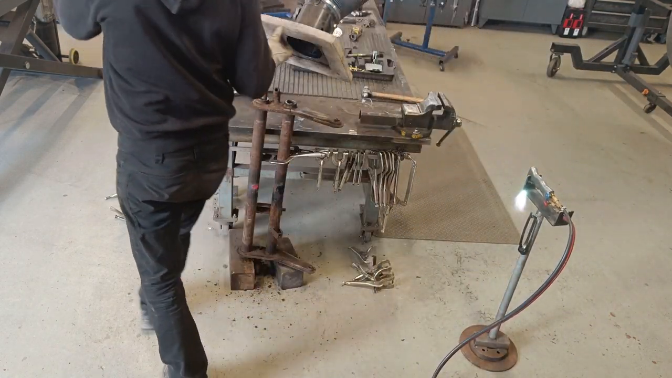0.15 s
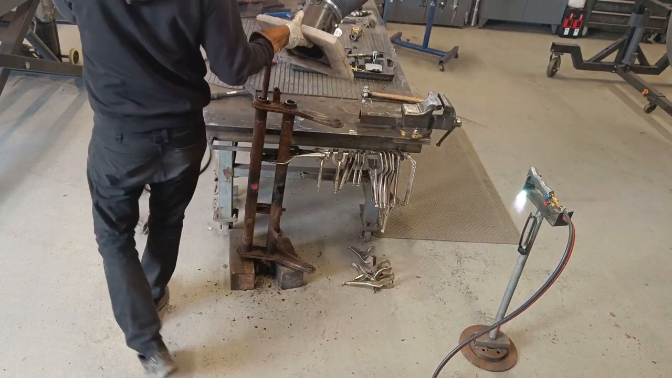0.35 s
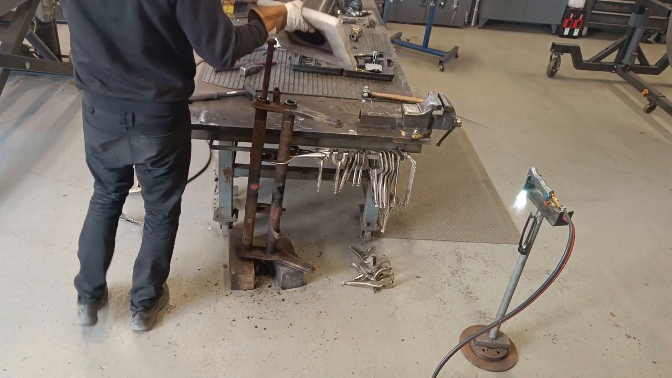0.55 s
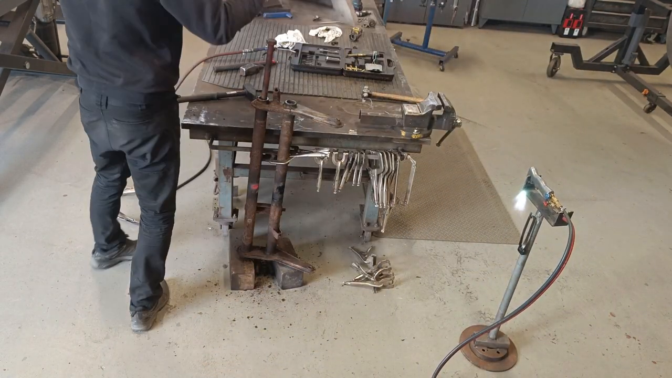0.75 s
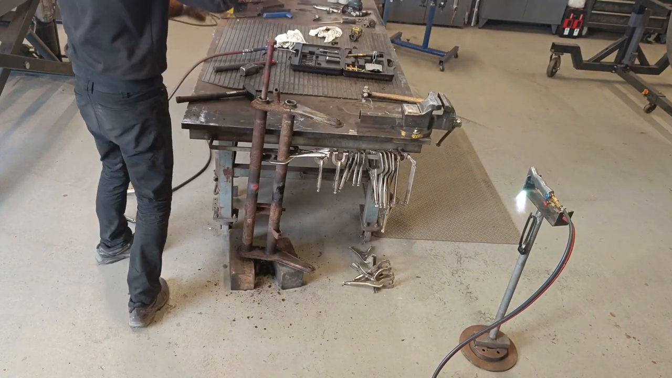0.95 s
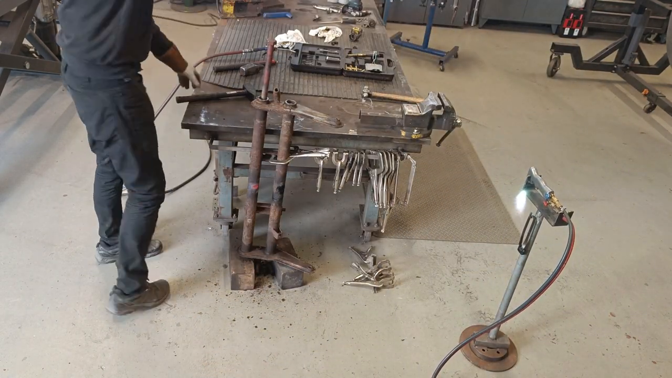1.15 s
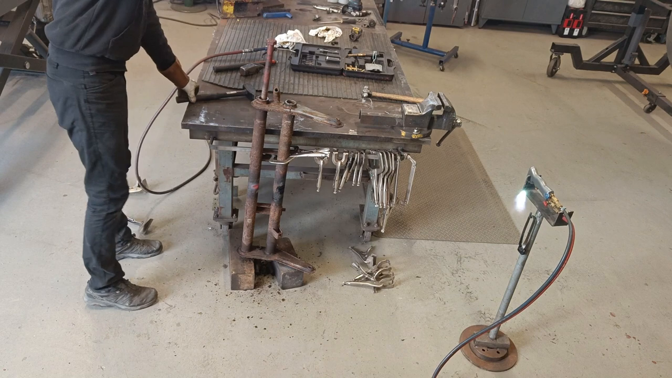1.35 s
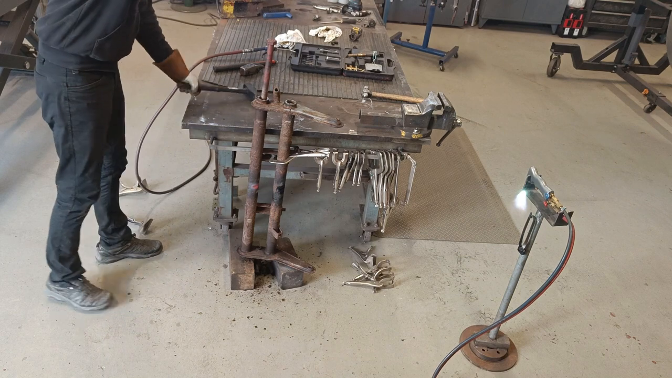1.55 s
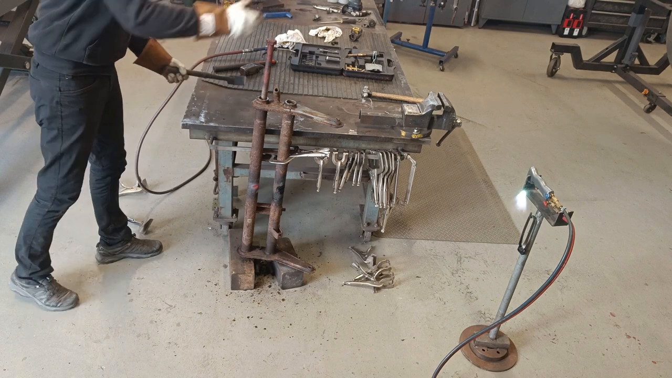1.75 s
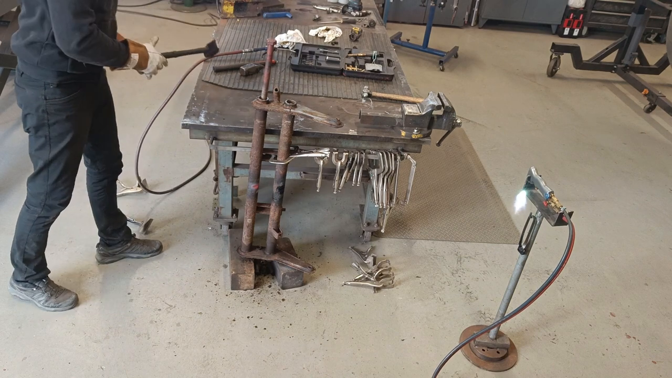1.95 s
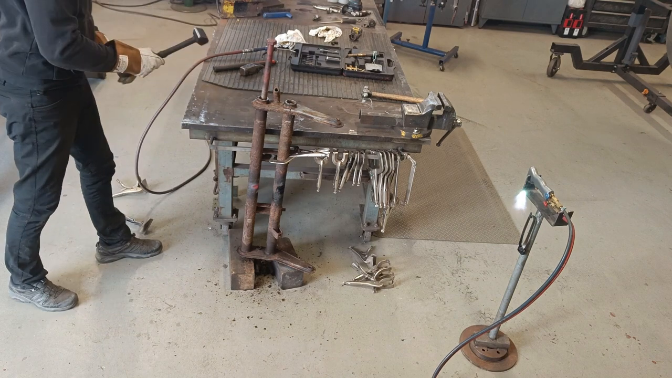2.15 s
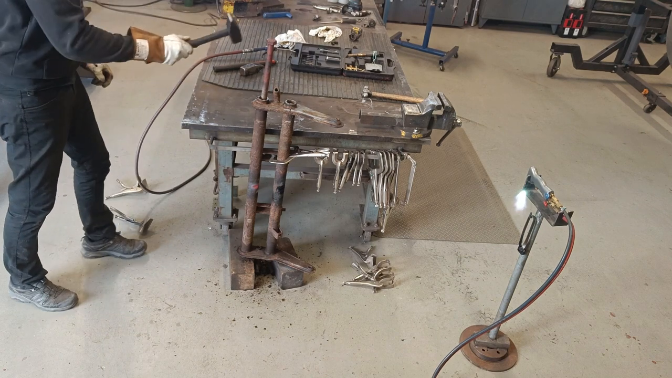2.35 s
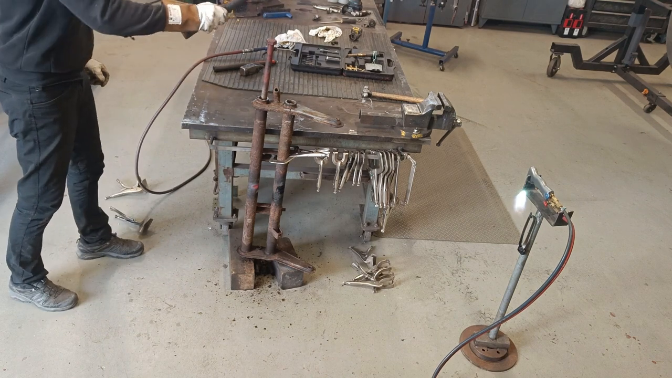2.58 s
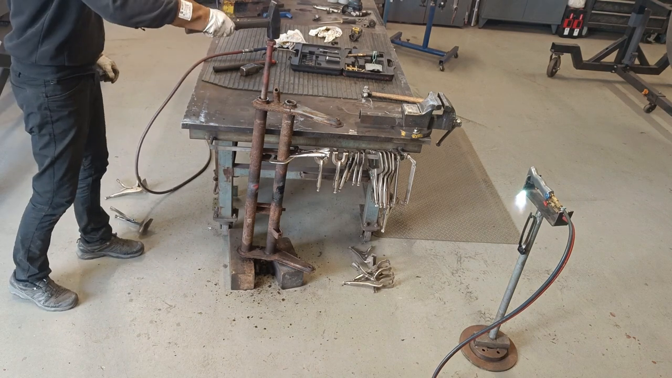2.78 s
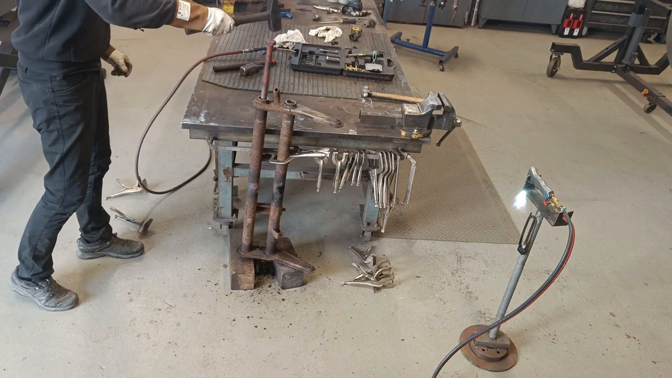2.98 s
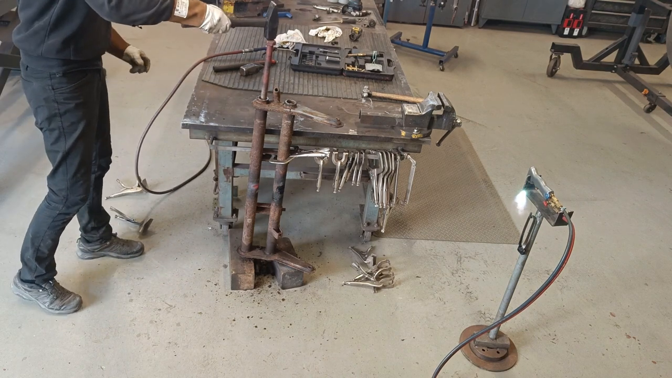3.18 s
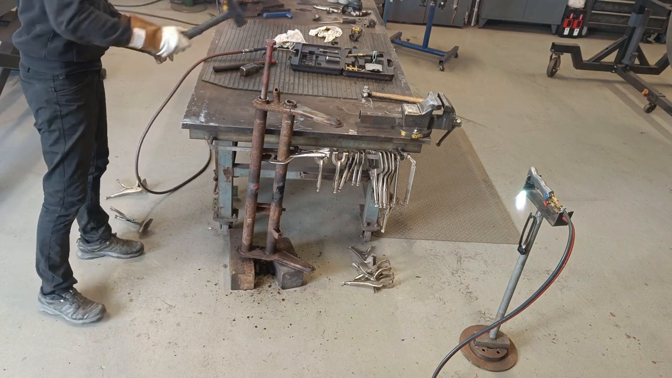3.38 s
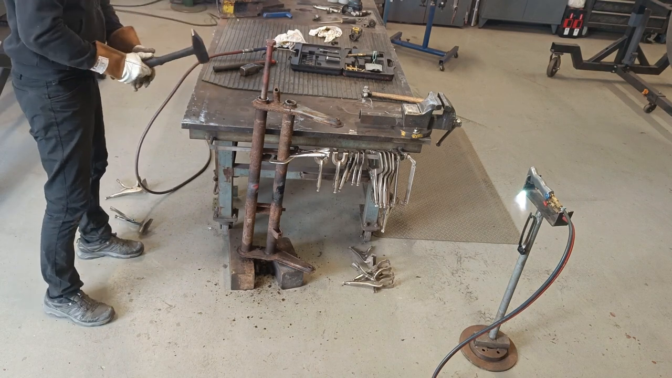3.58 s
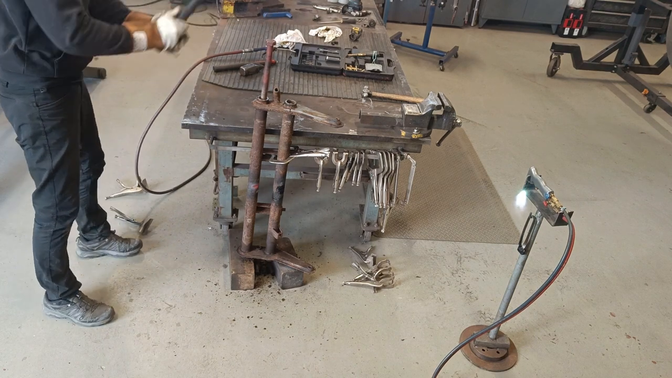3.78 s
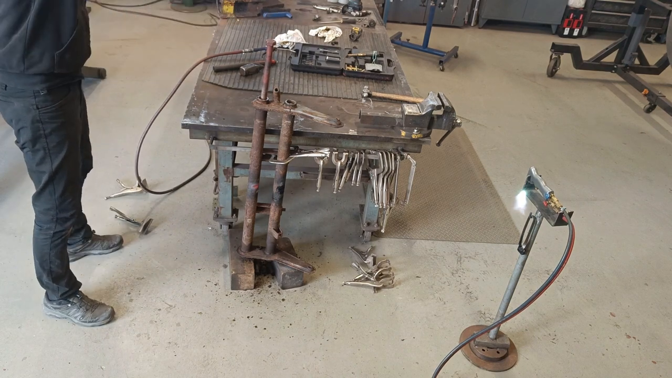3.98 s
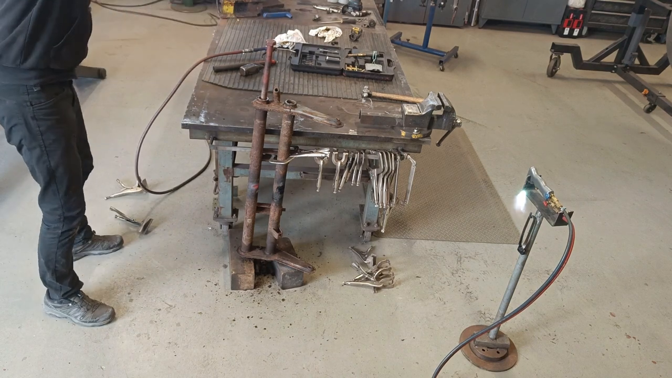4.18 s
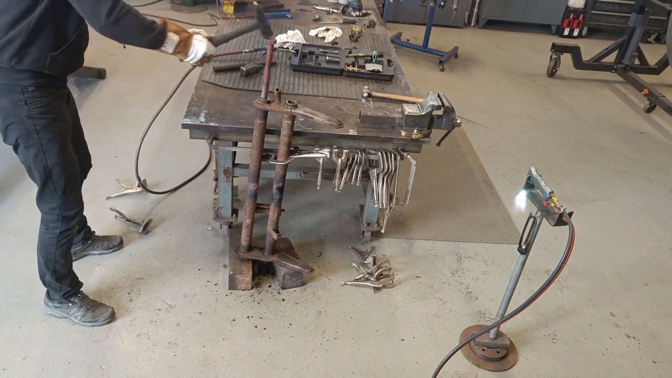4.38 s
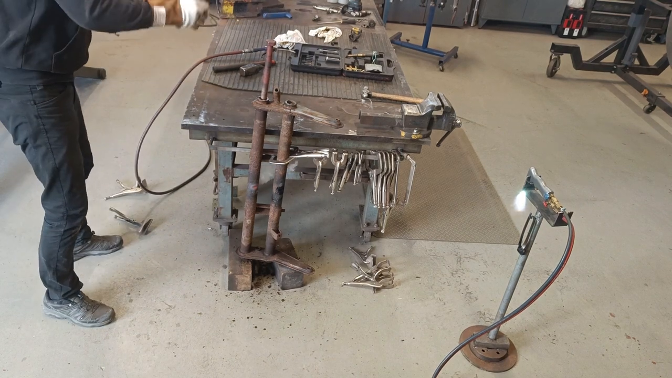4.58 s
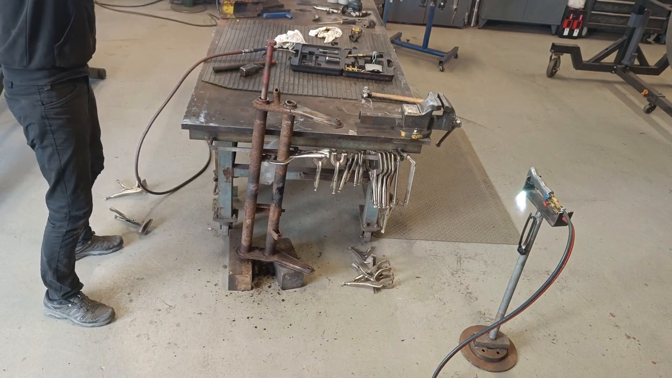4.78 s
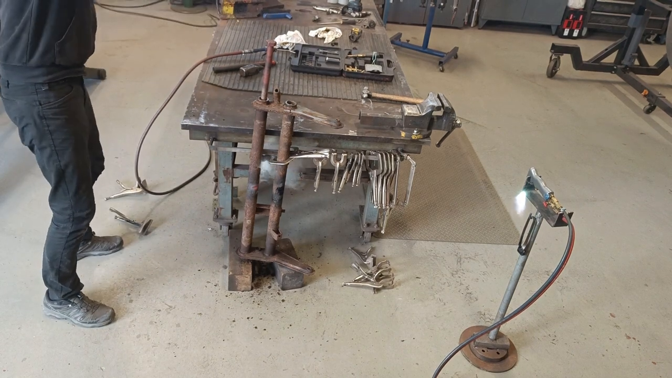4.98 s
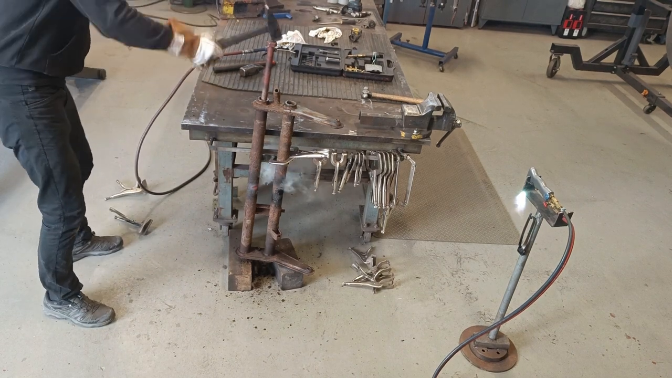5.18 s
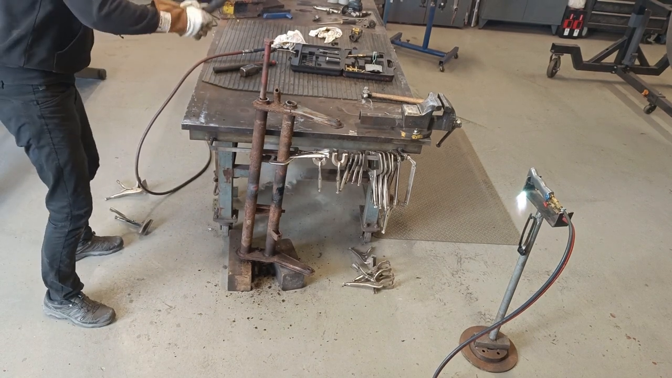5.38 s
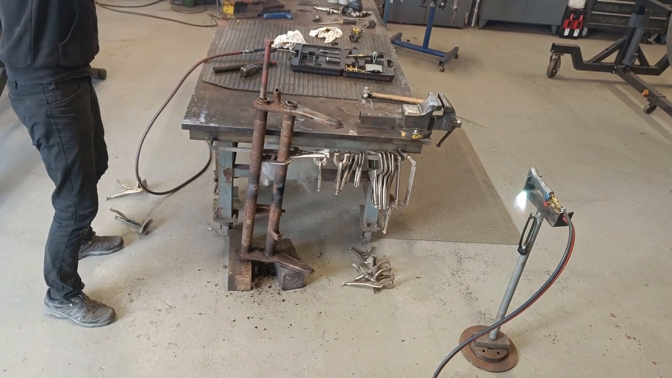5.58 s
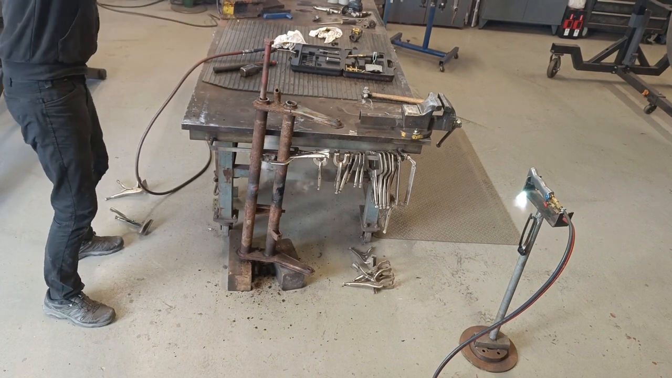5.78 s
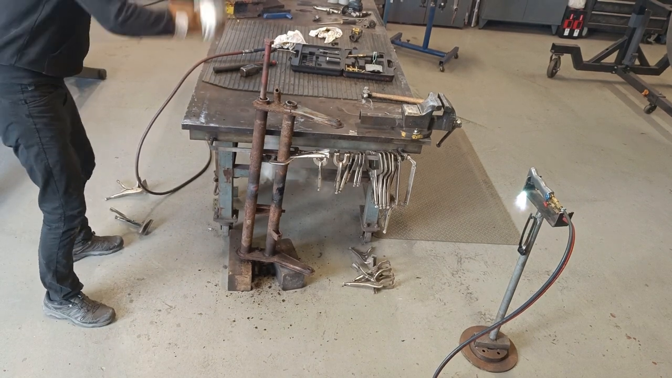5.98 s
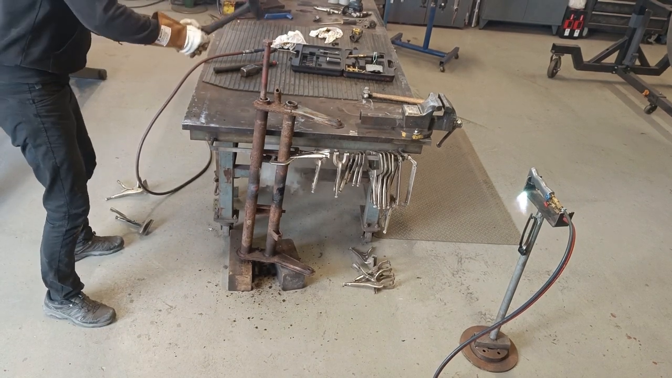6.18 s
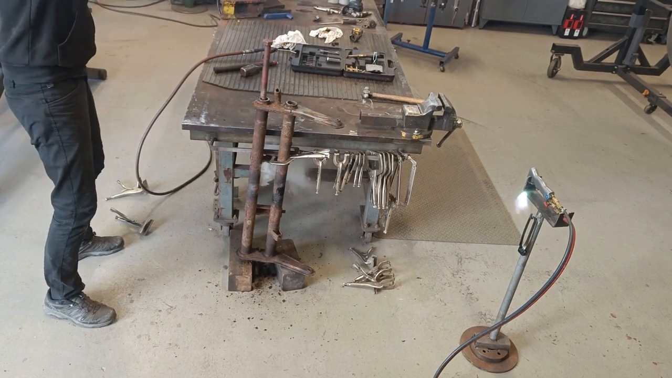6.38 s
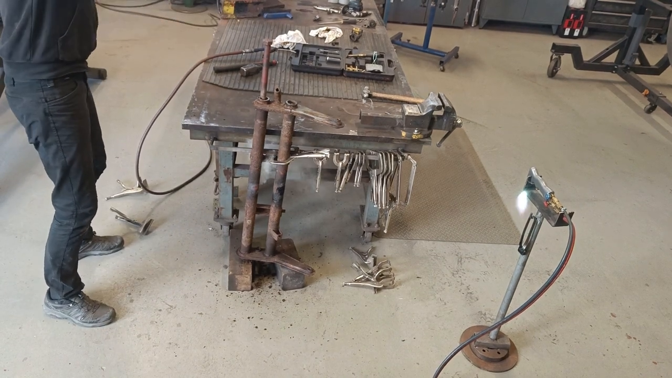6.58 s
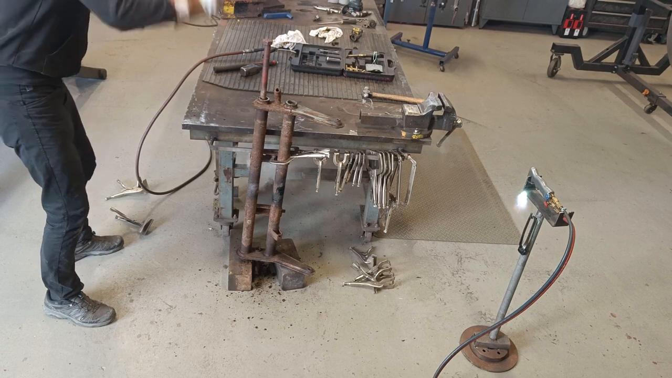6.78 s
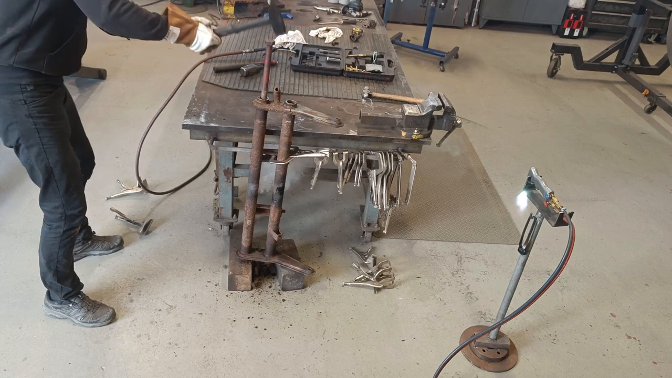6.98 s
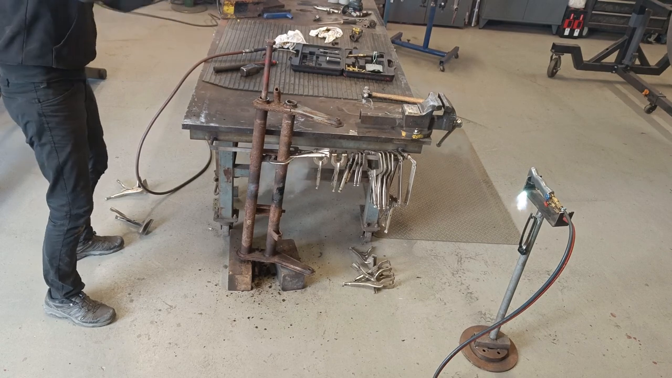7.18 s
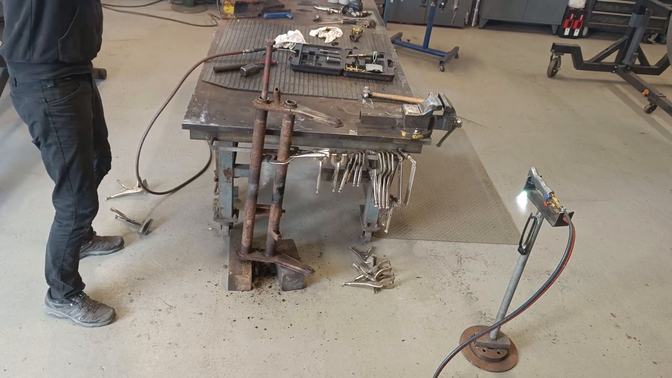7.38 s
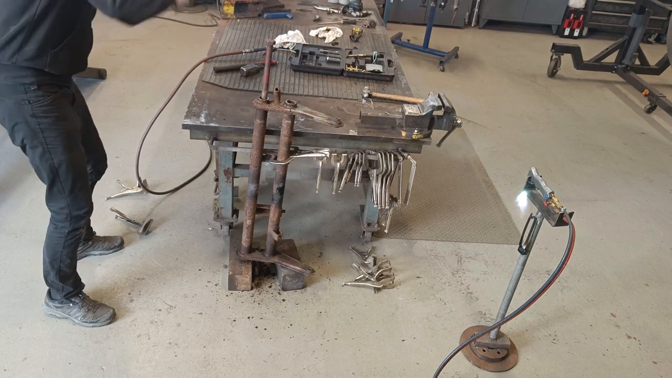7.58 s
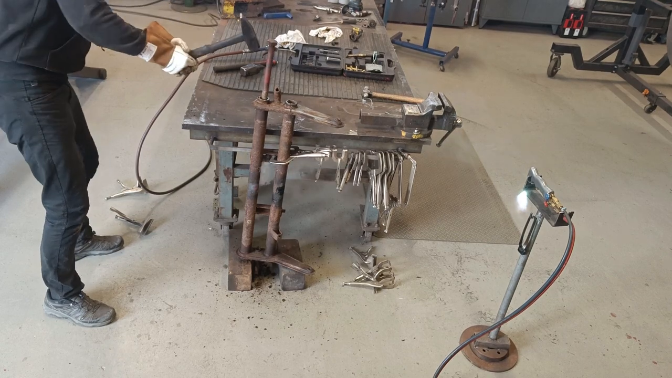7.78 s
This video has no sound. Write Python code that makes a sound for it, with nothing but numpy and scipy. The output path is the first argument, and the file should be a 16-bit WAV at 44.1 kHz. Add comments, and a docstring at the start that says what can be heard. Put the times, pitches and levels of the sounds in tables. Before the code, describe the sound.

Two light metallic taps, then five hard, evenly spaced hammer strikes on a steel rod, clattering and echoing over constant fan rumble and flame hiss.

```python
"""An extractor fan hums and a gas flame hisses throughout, both made of shaped noise with duct resonances.
Then a hammer drives down a steel rod clamped to a welding table in a large workshop. Rod and table ring as
decaying modes, loose clamps clatter as random ticks, and table and floor answer with swells of low noise.
An echoing hall surrounds the blows; a gain control turns loud moments down and creeps back."""
import sys
import numpy as np
from scipy import signal
from scipy.fft import rfft, irfft
from scipy.io import wavfile
from scipy.ndimage import uniform_filter1d, minimum_filter1d

SR = 44100
rng = np.random.default_rng(int(sys.argv[2]) if len(sys.argv) > 2 else 0)


def waveform_to_disk(signal):
    """Save audio, clipped to [-1, 1], as 16-bit WAV at the path in sys.argv[1]."""
    frames = np.transpose(np.atleast_2d(signal))
    scaled = np.clip(frames, -1, 1) * 32767
    samples = np.round(scaled).astype(np.int16)
    wavfile.write(sys.argv[1], SR, samples)


N = 345744
TIME_S = np.arange(N) / SR

# The hammer blows. Each row: start in seconds, force in dB, relative ring level in dB, relative level of the
# dull table clatter in dB, spot struck (in bending half-waves at 1 kHz from a node, a point of the shape
# that stays still), and damping by the grip in dB per second.
BLOWS = [(2.792, -14.5, 2.5, -14.5, 6.14, 45), (3.107, -19, -3, -16, 0.51, 90),
         (4.416, -8.5, -4, -12, 5.21, 45), (5.246, -6.5, 0.5, -11, 6.97, 4),
         (6.044, -5.5, 1.5, -14, 9.04, 22), (6.865, -6, 6, -9, 3.03, 3), (7.680, -4, 10, -4.5, 0.55, 8)]
FULL_BLOW_DB = -6   # the force at which the parts below have their stated levels


def amp(db):
    """Turns dB into a gain."""
    return 10 ** (np.asarray(db) / 20)


def rms_one(x):
    """Scales a signal to an rms (average strength) of 1."""
    return x / np.sqrt(np.mean(x ** 2) + 1e-20)


def at_hz(points, hz):
    """Reads a table of (Hz, value) at any pitch, on a log-frequency axis."""
    points_hz, values = np.transpose(points)
    return np.interp(np.log(hz + 1), np.log(points_hz), values)


def coloured(x, spectrum):
    """Filters x by a table of (Hz, dB) and scales it to rms 1."""
    hz = np.fft.rfftfreq(N, 1 / SR)
    return rms_one(irfft(rfft(x) * amp(at_hz(spectrum, hz)), N))


def one_pole(x, seconds):
    """Smooths x with a time constant, like a bucket that fills and drains gradually."""
    r = np.exp(-1 / (max(seconds, 1e-4) * SR))
    return signal.lfilter([1 - r], [1, -r], x)


def strikes(db):
    """One click per blow, at the given levels."""
    clicks = np.full(N, 1e-18)
    clicks[[round(row[0] * SR) for row in BLOWS]] = amp(db)
    return clicks


def dying(db, seconds):
    """An envelope that jumps at each blow and falls exponentially."""
    return one_pole(strikes(db), seconds) * seconds * SR


def by_force(full_db, grows):
    """Level of a part at each blow: it gains `grows` dB for each dB of force."""
    return full_db + grows * (np.array(BLOWS)[:, 1] - FULL_BLOW_DB)


def air(spectrum, level_db):
    """Steady stereo air noise through duct resonances, most alike left and right in the bass."""
    # Resonances of duct and nozzle. Each row: pitch in Hz, width in Hz, boost in dB.
    duct = [(117, 10, 3.5), (139.3, 4, 4.5), (164, 7.8, 8), (254.3, 26.6, 8), (411.5, 17, 7),
            (511, 14, 3.5), (584, 64, 4.5), (803, 8.5, 7), (1081, 162, 9), (1398, 12.4, 11.5),
            (6310, 20, 10.5), (6820, 170, 4)]
    # How alike left and right are. Each row: pitch in Hz, likeness (1 same, 0 unrelated, below 0 opposed).
    likeness = [(25, .7), (60, 0.99), (150, 1), (380, 0.82), (700, 0.79), (1290, 0.093), (2380, 0.47),
                (4400, 0.1), (8120, -0.24), (15000, -0.017)]
    # Stereo balance. Each row: pitch in Hz, left minus right in dB.
    tilt = [(60, -1), (250, .5), (1000, -0.5), (2500, -1), (4500, -3), (6500, -6), (8500, 2), (12000, 3),
            (15000, -5.5)]
    left_lag_s = .0001   # the noise reaches the left side late

    hz = np.fft.rfftfreq(N, 1 / SR)
    shape_db = at_hz(spectrum, hz)
    for top_hz, width_hz, boost_db in duct:
        shape_db = shape_db + boost_db / (1 + (2 * (hz - top_hz) / width_hz) ** 2)
    alike = np.clip(at_hz(likeness, hz), -1, 1)
    mid, side = rfft(rng.standard_normal((2, N)))
    pair = np.sqrt(1 + alike) * mid + np.sqrt(1 - alike) * side * [[1], [-1]]
    pair = pair * amp(shape_db + at_hz(tilt, hz) * [[.5], [-.5]])
    pair[0] *= np.exp(-2j * np.pi * hz * left_lag_s)
    return amp(level_db) * rms_one(irfft(pair, N))


def fan():
    """The extractor fan: a rush of air noise whose bass slowly swells and sinks."""
    # Colour of the rush. Each row: pitch in Hz, relative level in dB per Hz.
    rush_colour = [(15, -55), (25, -27), (69, -25.5), (143, 1.5), (218, -17.5), (580, -12.5), (738, -12.5),
                   (1080, -19.5), (1270, -20.5), (1370, -17), (2050, -18.5), (3000, -31), (3900, -34),
                   (6600, -120)]
    # How the bass wavers. Each row: time in seconds, change in dB.
    hum_swell = [(0, -1), (.4, -3), (.9, 1), (2, 1), (3, 3), (4.2, 1), (7.84, 1.5)]
    rush = air(rush_colour, -24.5)
    bass = signal.sosfiltfilt(signal.butter(2, 220, fs=SR, output="sos"), rush)   # below about 220 Hz
    swell_gain = amp(np.interp(TIME_S, *np.transpose(hum_swell)))
    return rush + bass * (swell_gain - 1)


def flame():
    """The gas flame: a steady hiss of air noise."""
    # Colour of the hiss. Each row: pitch in Hz, relative level in dB per Hz.
    hiss_colour = [(2000, -10.5), (3000, -3.5), (4200, -2.5), (5600, -3), (6000, 0.5), (6900, -4),
                   (7400, -7), (8600, -10), (9800, -9.5), (11600, -7.5), (13500, -8), (15200, -8)]
    return air(hiss_colour, -24)


def hall(x):
    """Echoes of x as noise that dies at its own rate in each pitch band, unrelated left and right."""
    # How long the hall rings. Each row: pitch in Hz, time to fall by 60 dB in seconds.
    hall_t60 = [(125, 0.17), (500, 1.75), (2000, 1.24), (5000, 0.89), (10000, 0.18)]
    level_db, build_up_s = 1.5, 0.0082
    t = np.arange(SR) / SR
    tail = 0
    edges = 60 * 2 ** np.arange(9.0)   # octave bands, in Hz
    for low, high in zip(edges, edges[1:]):
        band_filter = signal.butter(2, [low, high], "band", fs=SR, output="sos")
        band = signal.sosfilt(band_filter, rng.standard_normal((2, SR)))
        tail = tail + band * amp(-60 * t / at_hz(hall_t60, np.sqrt(low * high)))
    tail = tail * np.minimum(t / build_up_s, 1)   # the first walls are a few metres off
    echo = amp(level_db) * rms_one(tail) / np.sqrt(SR)
    return signal.fftconvolve(x[None], echo, axes=1)[:, :N]


def thud():
    """The heavy table answers late with a low rumble, and the floor slab under it with a deeper one."""
    # Colour of the table's rumble. Each row: pitch in Hz, relative level in dB per Hz.
    table_colour = [(40, -27), (70, -5), (110, 13), (150, 11), (230, 9), (300, -7), (450, -50)]
    # Colour of the floor slab's boom. Each row: pitch in Hz, relative level in dB per Hz.
    floor_colour = [(25, -30), (45, -18), (65, 22), (90, 17), (140, -53)]
    rise_s, fall_s = .02, .07   # time constants
    table_db = by_force(-3.5, 1.53)   # the table legs need a hard blow
    floor_db = by_force(-21, 0.21)   # the slab answers any blow
    out = 0
    for colour, db in ((table_colour, table_db), (floor_colour, floor_db)):
        swell = one_pole(dying(db, fall_s), rise_s)
        swell = one_pole(swell, rise_s)   # smoothed twice for a soft start
        out = out + coloured(rng.standard_normal(N), colour) * swell
    return out


def lumps():
    """A gain that wanders quickly at random, as rattling parts jump in uneven bunches; rms 1."""
    depth_db, per_s = 3, 70
    knots = TIME_S * per_s
    count = int(knots[-1]) + 2
    wander = np.interp(knots, np.arange(count), rng.standard_normal(count))
    return rms_one(amp(depth_db * wander))


def clatter():
    """Clamps and tools jump on the table: dense uneven ticks that die away, with a short bright crack."""
    # Clatter of the table top. Each row: pitch in Hz, relative level in dB per Hz.
    dull_colour = [(250, -0.5), (450, -2.5), (900, 1), (1600, 1), (2200, 0.5), (2700, -21), (4000, -38)]
    # Clatter of small parts. Each row: pitch in Hz, relative level in dB per Hz.
    bright_colour = [(2000, -22), (2900, -5.5), (3400, -9), (3800, 3), (4400, -2), (5100, -6.5),
                     (5500, -7.5), (6600, -6), (7750, -17), (15500, -47)]
    # Crack of steel on steel. Each row: pitch in Hz, relative level in dB per Hz.
    crack_colour = [(1500, 13.5), (4000, 12), (7000, -16), (11000, 7), (15500, -10)]
    ticks_per_s, rise_s = 5000, 0.0025
    fall_s = .3 / np.log(1000)   # falls by 60 dB in 0.3 s
    crack_fall_s = 0.11 / np.log(1000)   # falls by 60 dB in 0.11 s
    dull_db = np.array(BLOWS)[:, 3] - 4
    bright_db = by_force(-8.5, 1.14)   # small parts and crack need a hard blow
    crack_db = by_force(-12, 1.95)

    ticks = (rng.random(N) < ticks_per_s / SR) * rng.standard_normal(N)
    dull = coloured(ticks, dull_colour) * one_pole(dying(dull_db, fall_s), rise_s)
    bright = coloured(ticks, bright_colour) * one_pole(dying(bright_db, fall_s), rise_s)
    crack = coloured(ticks, crack_colour) * dying(crack_db, crack_fall_s)
    return dull * lumps() + bright * lumps() + crack


def flutter():
    """A random wandering gain for left and for right, as the rod shivers in its clamps; rms 1."""
    depth, per_s = 1.9, 70
    knots = TIME_S * per_s
    steps = rng.standard_normal((2, int(knots[-1]) + 2))
    wander = np.array([np.interp(knots, np.arange(len(row)), row) for row in steps])
    return rms_one(1 + depth * wander)


def steel():
    """Rod and table ring in many modes (pure tones that die away); the spot struck sets each one's strength."""
    # Pitch of each mode, in Hz.
    mode_hz = [1626, 1760, 1836, 2045, 2102, 2130, 2168, 2236, 2985, 3087, 3132, 3660, 3720, 3762, 3850,
               4090, 4175, 4226, 4403, 4460, 4505, 4624, 4700, 4945, 5130, 5230, 5577, 6390]
    # Relative level of each mode, in dB.
    mode_db = [-16, -19, -18, -18, -14, -16, -16, -16, -20, -16, -17, -16, -16, -15, -18, -17, -16, -14,
               -14, -14, -16, -20, -20, -14, -18, -20, -18, -23]
    # Time each mode takes to fall by 60 dB before the grip shortens it, in seconds.
    mode_t60 = [.3, .25, .3, .4, 1.25, 1.1, .8, .3, .25, .4, .35, .22, .48, .5, .3, .25, .3, .3, .5, .5, .5,
                .3, .3, .6, .35, .3, .3, .25]
    # Families of modes that share a bending shape: centre pitch of each, in Hz.
    family_centres = [1740, 2130, 3070, 3750, 4165, 4500, 5100]
    node_leak = 0.02   # power a family keeps when struck on its node
    contact_s = .004   # the blow spreads through rod, clamps and table over this time

    start_s, _, ring_db, _, spot, grip = np.transpose(BLOWS)
    chance_db = rng.normal(0, 1.0, (len(BLOWS), len(mode_hz)))
    late = (rng.random(len(mode_hz)) * contact_s * SR).astype(int)   # each mode starts a moment apart
    out = 0
    for k, (hz, level_db, t60) in enumerate(zip(mode_hz, mode_db, mode_t60)):
        family_hz = min(family_centres, key=lambda centre: abs(np.log(centre / hz)))
        half_waves = spot * np.sqrt(family_hz / 1000)   # bending waves shorten as the root of pitch
        shape = np.sqrt(np.sin(np.pi * half_waves) ** 2 + node_leak)
        blow_db = ring_db + level_db + chance_db[:, k] + 20 * np.log10(shape)
        clicks = np.roll(strikes(blow_db), late[k])
        # A resonator: each click sets off a sine wave that decays
        r = amp(-60 / (t60 * SR))
        w = 2 * np.pi * hz / SR
        mode = signal.lfilter([0, np.sin(w)], [1, -2 * r * np.cos(w), r * r], clicks)
        out = out + mode * flutter()
    last = np.maximum(np.searchsorted(start_s, TIME_S) - 1, 0)   # the latest blow
    since_s = np.maximum(TIME_S - start_s[last], 0)
    return out * amp(-grip[last] * since_s)   # a firm grip shortens the ring


def scene():
    """Blows with their hall, over fan and flame."""
    background = fan() + flame()
    low, rattle, ring = thud(), clatter(), steel()
    into_hall = amp(-8.5) * ring.mean(axis=0) + rattle + amp(-12.5) * low
    blows = ring + rattle + hall(into_hall)
    return blows * amp([[-.7], [.7]]) + low + background   # blows lean a little to the right


def recovering(cut_db, db_per_s):
    """A gain cut that lets go at a steady rate."""
    ramp = db_per_s * TIME_S
    return np.maximum.accumulate(cut_db + ramp) - ramp


def gain_control(x):
    """Turns the sound down when its smoothed loudness is high, holds the cut, then slowly lets go."""
    above_db, slope, recover_db_per_s = -21, 0.86, 20.5
    sense_s, smooth_s, hold_s = 0.047, 0.021, 0.2
    loud_db = 10 * np.log10(one_pole(np.mean(x ** 2, axis=0), sense_s) + 1e-12)
    cut_db = slope * np.maximum(loud_db - above_db, 0)
    hold = int(hold_s * SR)
    held_db = -minimum_filter1d(-cut_db, hold, origin=(hold - 1) // 2)   # the cut stays a while
    return x * amp(-one_pole(recovering(held_db, recover_db_per_s), smooth_s))


def peak_limiter(x):
    """Turns sharp peaks down quickly, starting just before they arrive."""
    limit_db, recover_db_per_s, window = -1.5, 396, 45   # window in samples
    over_db = np.maximum(20 * np.log10(np.abs(x).max(axis=0) + 1e-9) - limit_db, 0)
    ahead_db = -minimum_filter1d(-over_db, size=window)   # the limiter sees a peak coming
    return x * amp(-uniform_filter1d(recovering(ahead_db, recover_db_per_s), size=window))


def record(dry):
    """Slow gain control, then a fast peak limiter, then the treble above 15750 Hz is cut."""
    limited = peak_limiter(gain_control(dry))
    return signal.sosfilt(signal.ellip(14, .3, 80, 15750, fs=SR, output="sos"), limited)


dry = scene()
out = record(dry)
waveform_to_disk(out)
```